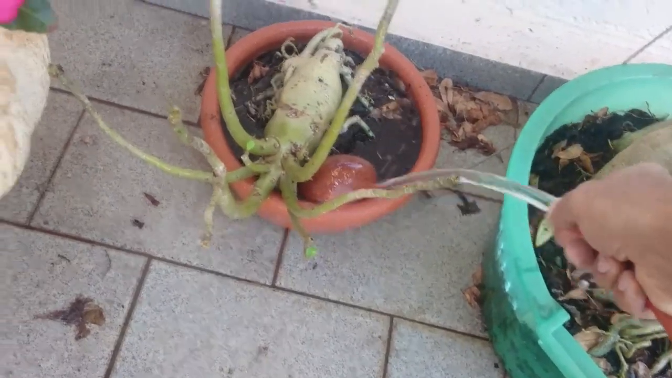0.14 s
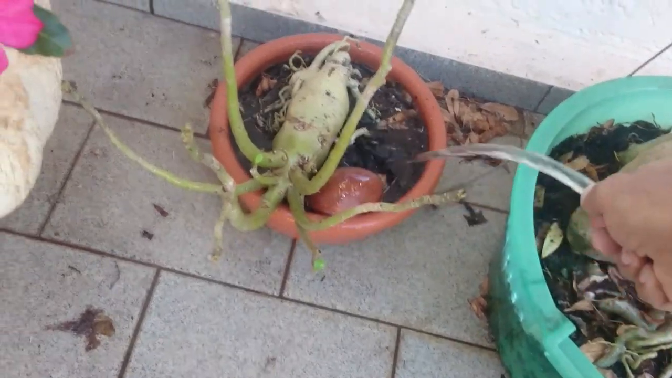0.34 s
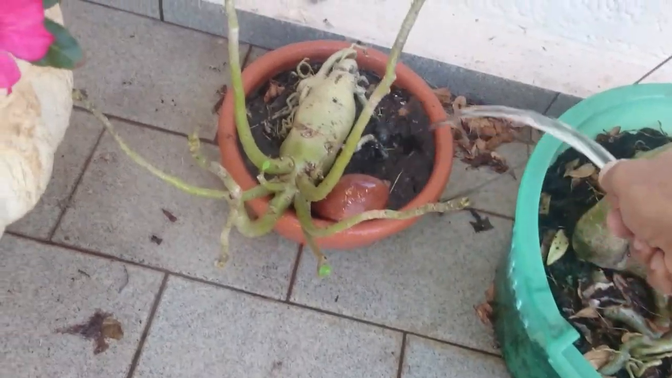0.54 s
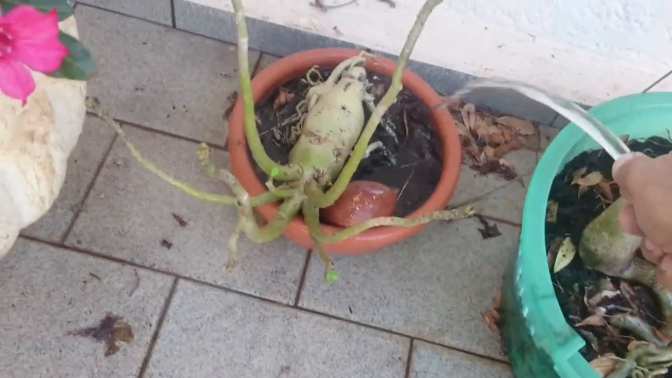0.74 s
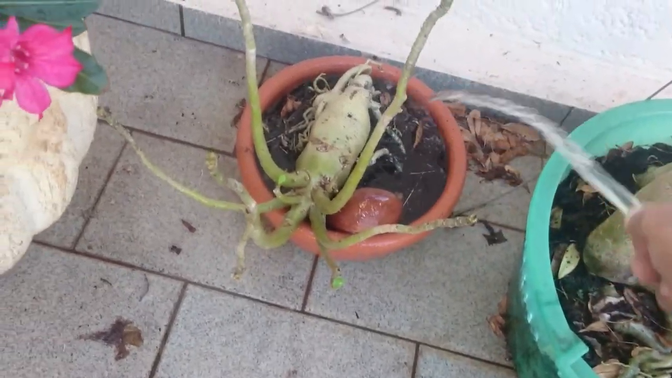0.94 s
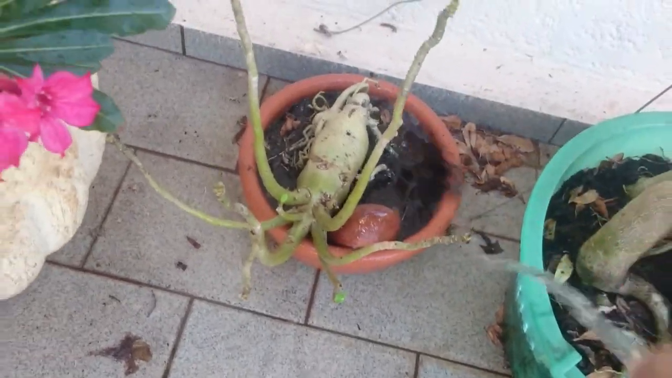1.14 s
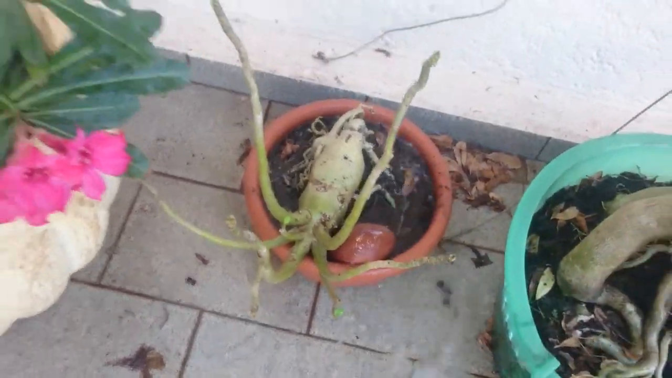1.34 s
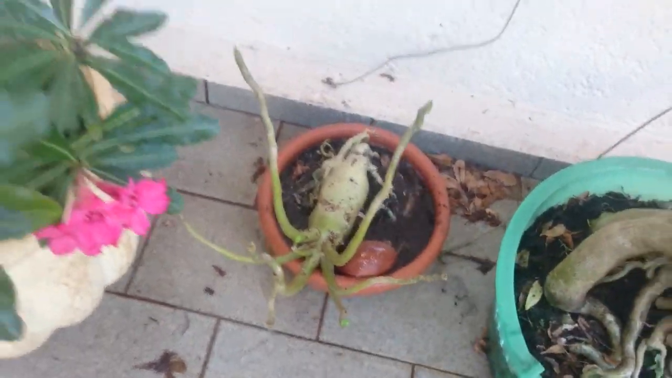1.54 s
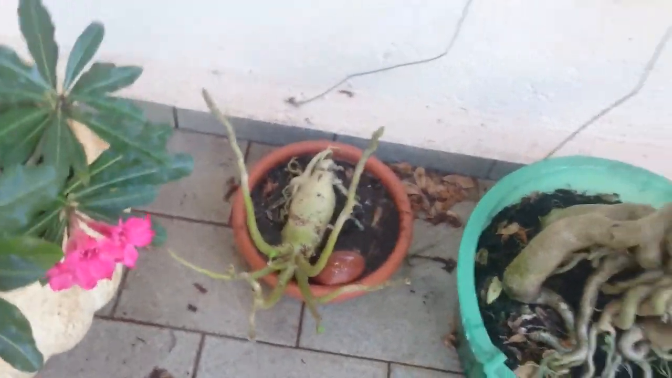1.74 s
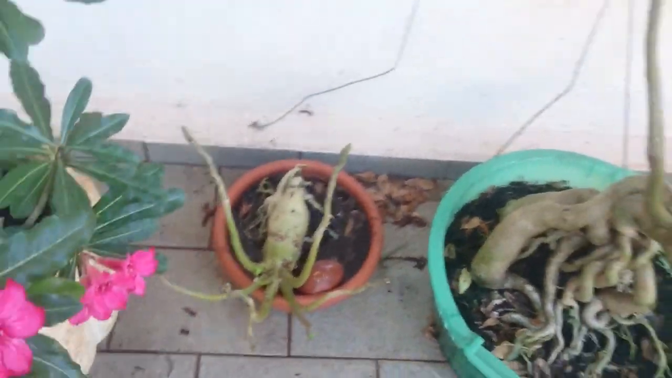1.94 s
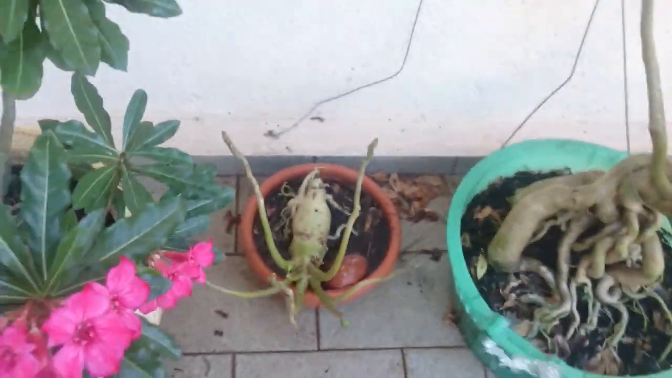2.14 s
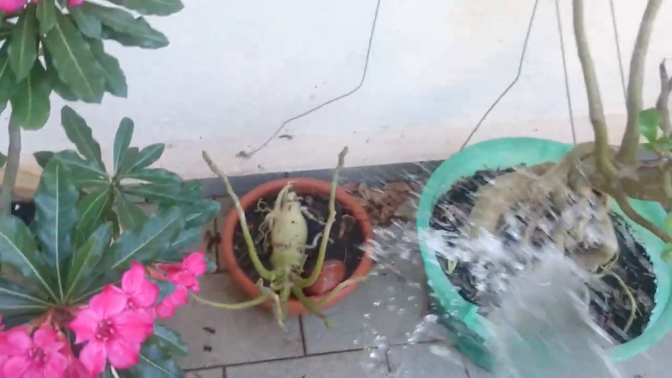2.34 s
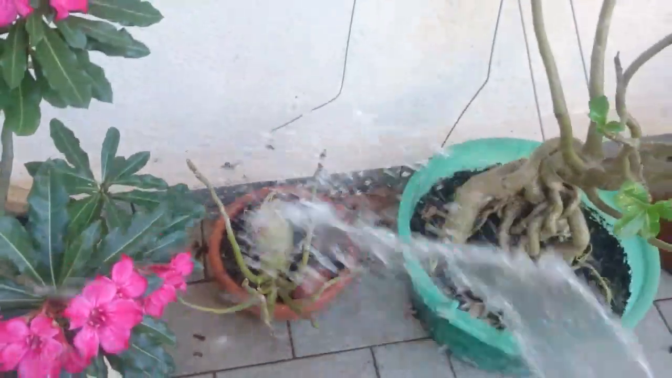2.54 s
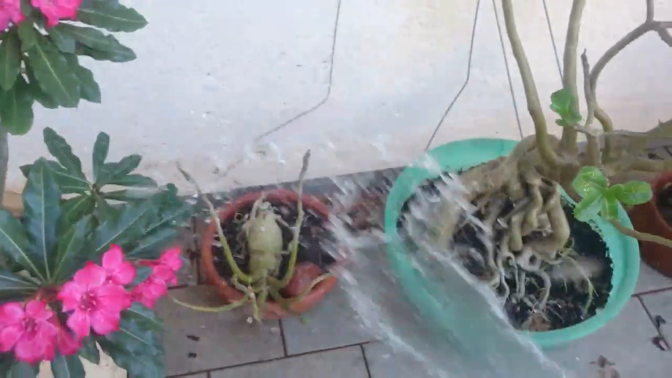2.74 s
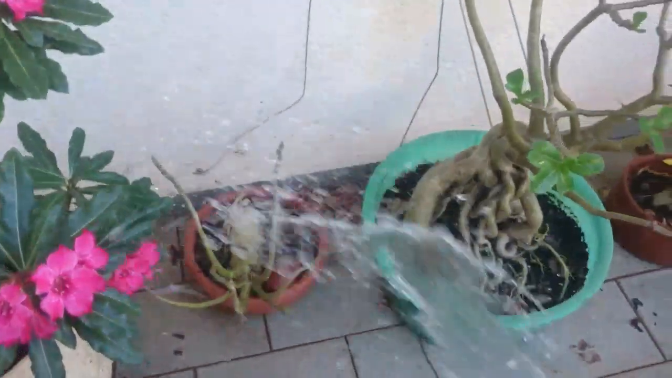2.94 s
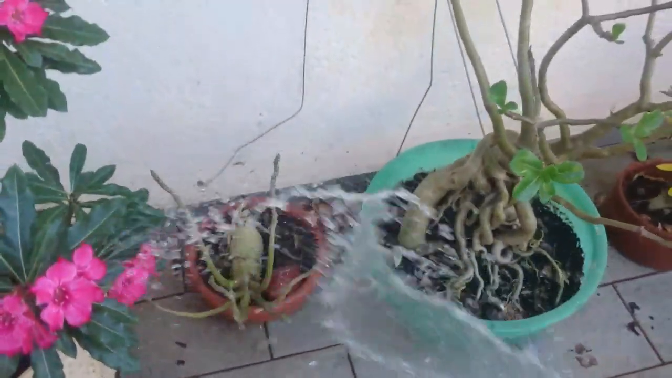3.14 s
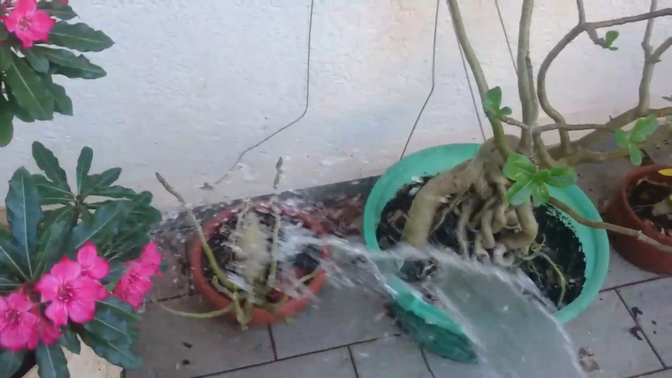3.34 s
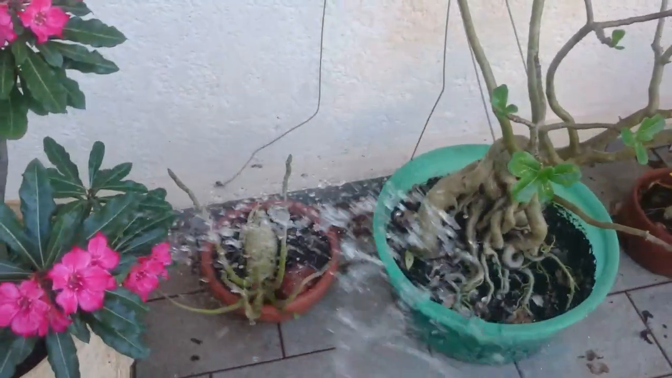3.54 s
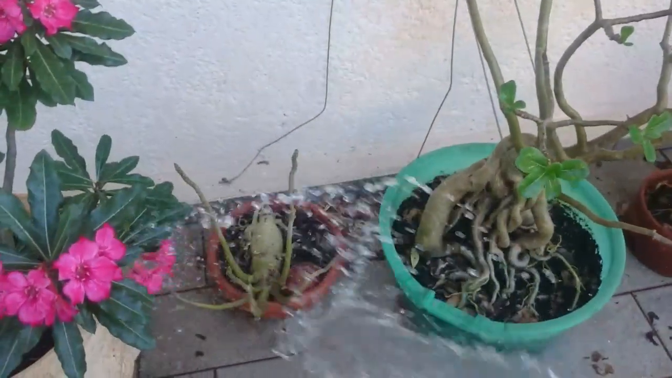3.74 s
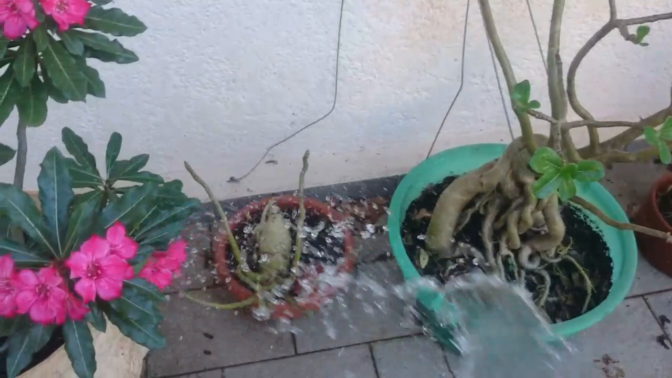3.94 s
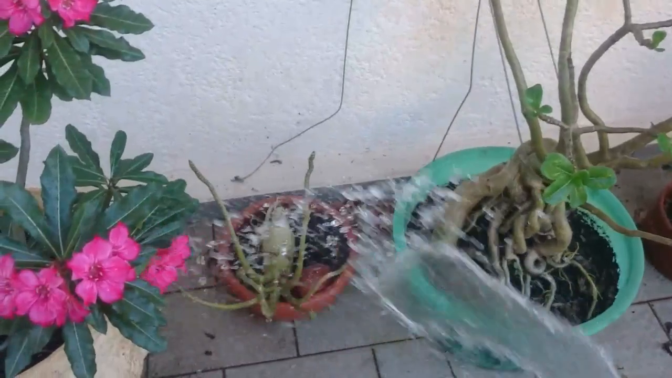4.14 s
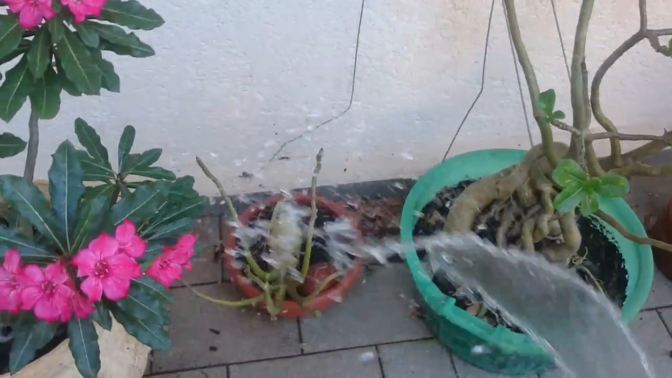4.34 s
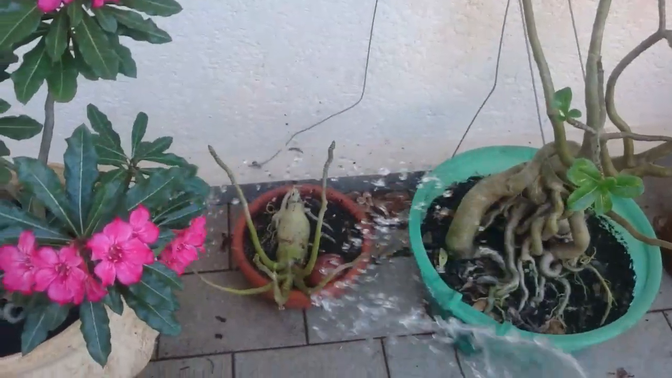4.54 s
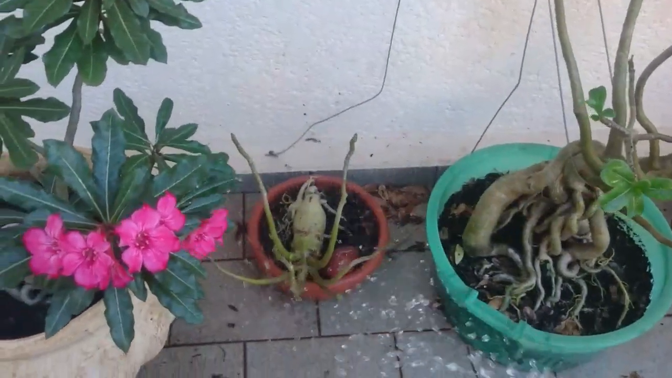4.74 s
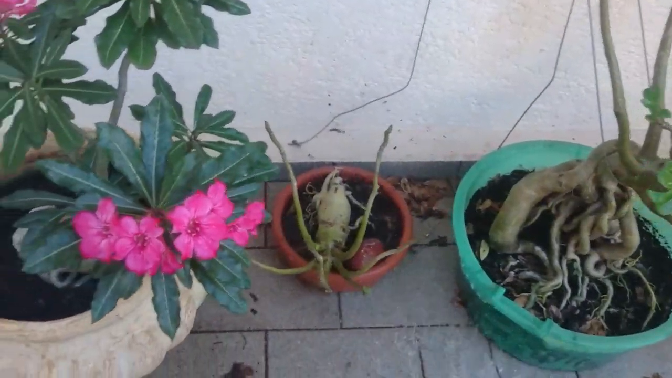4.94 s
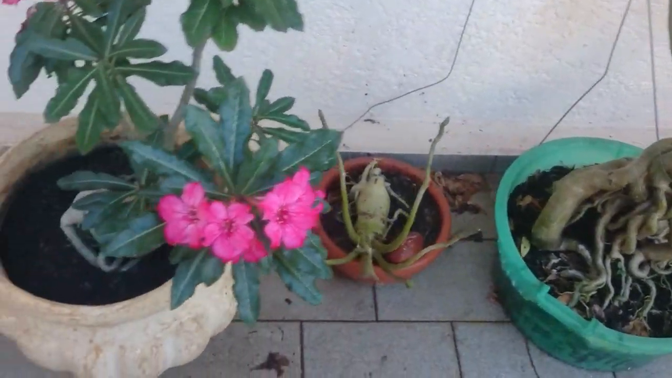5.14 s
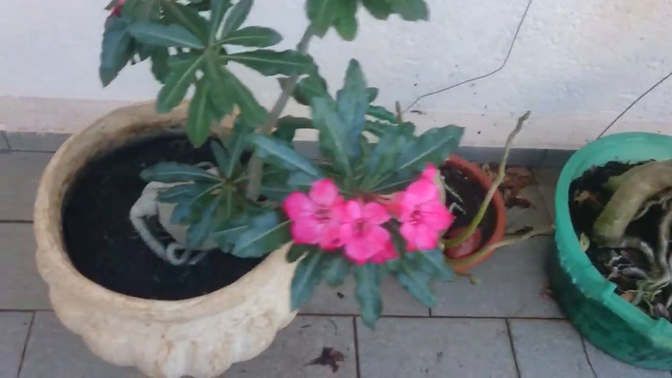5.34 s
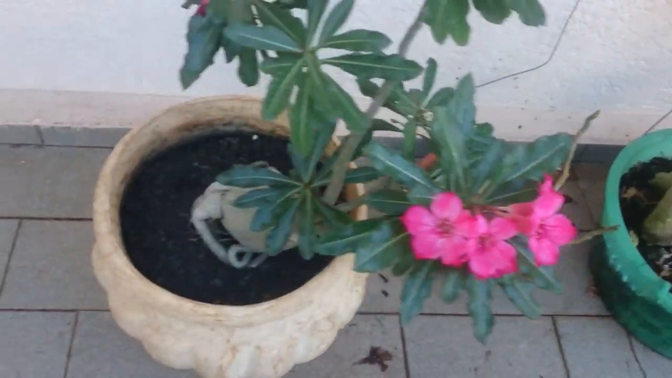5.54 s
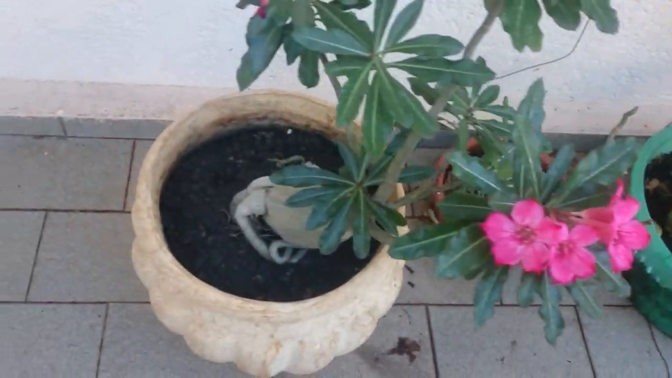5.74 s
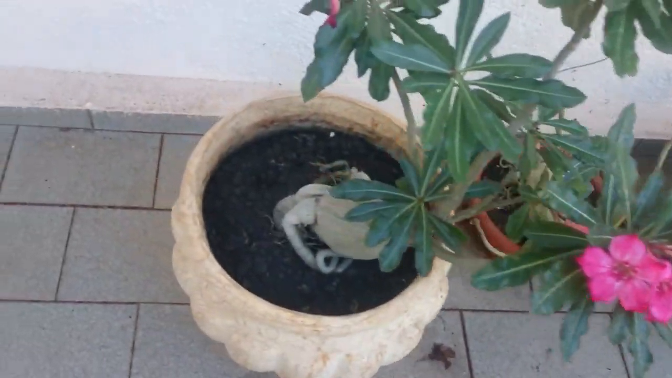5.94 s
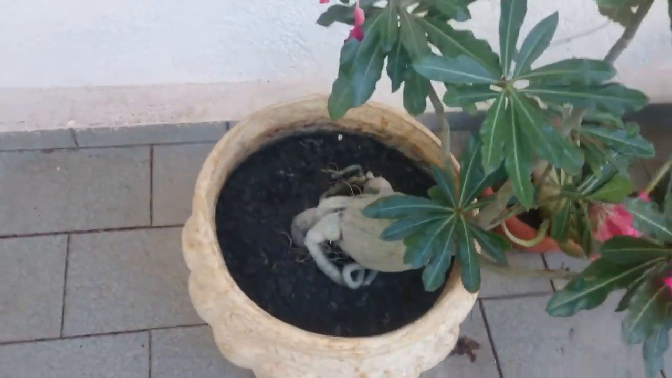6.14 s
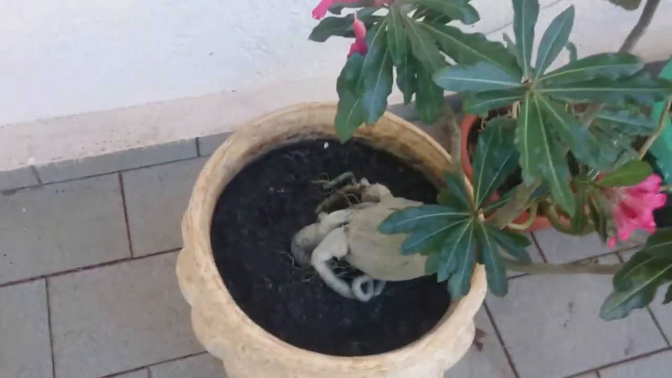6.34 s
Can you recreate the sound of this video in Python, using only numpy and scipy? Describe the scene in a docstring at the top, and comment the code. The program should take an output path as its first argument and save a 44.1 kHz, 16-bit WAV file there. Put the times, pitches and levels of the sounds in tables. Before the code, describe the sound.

A thin jet from a garden hose gurgles into the wet soil of a small flowerpot. It then fans out, and lumps of water slap unevenly on a big tub, leaves and tiles over a bright patter of drops. Near the end the spray moves off and patters more softly. The hand-held microphone is close, on a tiled patio with a short echo and a faint outdoor rumble.

```python
"""Garden hose on a tiled patio.

A thin jet gurgles into the soil of a small pot, trapping bubbles that ring. It fans out:
lumps of water slap on a big tub, leaves and tiles, over a patter of drops and mist.
The spray moves off and patters on. Tiles and house wall echo the water over a faint
outdoor rumble; air and handling bump the hand-held microphone."""
import sys
import numpy as np
from scipy import signal
from scipy.fft import rfft, irfft, next_fast_len
from scipy.io import wavfile

SR = 44100
rng = np.random.default_rng(int(sys.argv[2]) if len(sys.argv) > 2 else 0)


def to_wav(s):
    """Save 16-bit WAV."""
    ch = np.atleast_2d(s).T  # columns
    pcm = np.round(np.clip(ch, -1, 1) * 32767)  # PCM
    wavfile.write(sys.argv[1], SR, pcm.astype(np.int16))


N = 286650
TIME = np.arange(N) / SR


def amp(db):
    """Decibels to gain."""
    return 10 ** (np.asarray(db) / 20)


def unit(x):
    """Scale to rms 1."""
    return x / np.sqrt(np.mean(x ** 2) + 1e-20)


def panned(db):
    """Stereo gains for a left-minus-right level."""
    return amp(np.array([[.5], [-.5]]) * db)


def curve(rows, column=1):
    """Time table column at every sample."""
    columns = np.transpose(rows)
    return np.interp(TIME, columns[0], columns[column])


def at_hz(rows, hz, column=1):
    """Frequency table column, interpolated on a log axis."""
    columns = np.transpose(rows)
    return np.interp(np.log(hz + 1), np.log(columns[0]), columns[column])


def colour(x, rows, column=1):
    """Filter by a table of freq_hz, gain_db."""
    size = next_fast_len(N + 4096)
    gain = amp(at_hz(rows, np.fft.rfftfreq(size, 1 / SR), column))
    return irfft(rfft(x, size) * gain, size)[..., :N]


def add(mix, start_s, sound):
    """Mix in a stereo sound."""
    part = mix[:, max(round(start_s * SR), 0):][:, :sound.shape[1]]
    part += sound[:, :part.shape[1]]


def wander(step_s, t):
    """Random drift, rms about 1."""
    knots = rng.standard_normal(1024)
    return 1.2 * np.interp(t / step_s, np.arange(len(knots)), knots)


def swell(t, rise_s, fall_s):
    """Exponential rise and fall, peak 1 at t = 0."""
    return np.exp(np.minimum(t / rise_s, -t / fall_s))


def ping(hz, cycles, rise=0., size=1024):
    """Air pocket ring: soft onset, decay over a few cycles, optional pitch rise."""
    age = np.arange(size) / SR * hz / cycles
    return unit(age * np.exp(-2 * age) * np.sin(2 * np.pi * cycles * (age + rise * age ** 2 / 2)))


def bubble(centre_hz, scatter, cycles, spread_db, draws):
    """One rising stereo bubble; four draws in 0-1 set strength, pitch, pan and lag."""
    strength, tune, side, lag = draws
    hz = centre_hz * ((tune + .03) / (1.03 - tune)) ** (scatter / 2)
    ring = ping(hz, cycles, rise=0.063) * amp(spread_db * min(-np.log(1 - strength), 3))
    return np.array([ring, np.roll(ring, int(10 * lag))]) * panned(8 * (side - .5))


def splash(envelope, hz, lowest_hz, width_octaves, skirt_db):
    """Noise burst: one resonance in a skirt of hiss, cut below lowest_hz."""
    freq_hz = np.fft.rfftfreq(len(envelope), 1 / SR) + 1
    resonance = np.exp(-.5 * (np.log2(freq_hz / hz) / width_octaves) ** 2)
    skirt = amp(skirt_db) / np.sqrt(1 + (freq_hz / (2 * hz)) ** 2)
    gain = (resonance + skirt) / (1 + (lowest_hz / freq_hz) ** 10)
    hiss = irfft(rfft(rng.standard_normal((2, len(envelope)))) * gain) * envelope
    return hiss / np.sqrt((hiss ** 2).sum(1, keepdims=True) / (envelope ** 2).sum())


# Lowest ring of the wet surface, deep in soil, thin on leaves: time_s, pitch_hz
SURFACE_RING = [(.2, 1300), (1.2, 2980), (2.1, 2980), (2.3, 2100), (2.45, 2880), (2.8, 2180), (3.4, 1720),
                (3.83, 1600), (3.95, 3100), (4.2, 2400), (4.5, 2960)]
# Water lumps on pots, leaves and tiles: start_s, crack_db, pitch_hz, pan_db, droplets_db
LUMPS = [(.059, -31.5, 4850, -11, -46.5), (0.176, -32.5, 2440, 9, -36.5), (0.2081, -19.5, 2580, -2, -31.5),
         (.5823, -28, 4530, 8, -48), (1.227, -18.5, 4600, 5.5, -29), (1.2615, -29, 3990, -3, -31.5),
         (1.3342, -15, 4700, -0.5, -34), (1.538, -26, 4220, 1, -51), (1.65, -38, 4720, 2, -55),
         (1.795, -30, 8000, -6, -34), (1.9356, -21, 8450, 1, -31.5), (2.026, -24.5, 6130, 9, -39),
         (2.061, -23.5, 5100, 8, -45), (2.2543, -21, 4970, 5, -34), (2.2778, -11, 6300, -1.5, -34),
         (2.2894, -16.5, 5230, 4, -25.5), (2.3402, -16, 5560, 0.5, -34), (2.3997, -14.5, 4900, 2, -41),
         (2.4145, -21.5, 8800, 4, -34), (2.4572, -21, 4800, 1, -46), (2.4713, -13, 4600, 3.5, -41),
         (2.595, -16, 5000, 0, -28.5), (2.675, -28, 5000, -2, -31.5), (2.755, -19, 4700, 2, -36),
         (2.78, -30, 4400, -1, -31.5), (2.806, -12, 4260, -4.5, -25.5), (2.892, -24.5, 6840, 5, -41),
         (2.943, -28, 5500, 2, -33.5), (3.063, -18, 3900, -3, -32.5), (3.1253, -21.5, 4980, -6, -42),
         (3.1716, -14, 4240, -3, -26.5), (3.3463, -22.5, 9000, 0, -40), (3.365, -20, 6200, 0, -40),
         (3.4189, -12.5, 3700, 0, -32), (3.4308, -11.5, 4250, -3, -29), (3.452, -14.5, 4670, 3, -26),
         (3.482, -15, 3880, -5, -31), (3.5836, -17.5, 5140, -3, -25.5), (3.6898, -20, 4200, -3, -29),
         (3.8263, -17, 2270, -4, -36), (3.845, -24, 5800, 2.5, -31), (3.929, -16.5, 4900, 0, -41),
         (3.997, -24, 5000, 1, -29.5), (4.088, -39, 5100, -3, -30.5), (4.2074, -22, 3120, 1, -29),
         (4.239, -19, 5540, 1, -30), (4.272, -26, 7000, -4, -32), (4.36, -34, 5500, 9, -37),
         (4.431, -27, 8360, 3, -36), (4.521, -15, 4600, 1, -31), (4.6875, -18.5, 3670, 3.5, -28),
         (4.7687, -20, 9300, 4, -35), (4.8049, -14.5, 3600, 1, -36), (4.846, -19.5, 4860, 6, -42),
         (4.883, -16, 5560, 0, -29.5), (4.9057, -12.5, 4860, 4, -45), (4.9322, -17, 5330, 2, -26),
         (4.9842, -20, 5100, 10, -31.5), (5.008, -14.5, 4640, 1, -28.5), (5.184, -28.5, 4000, 0, -42),
         (5.2663, -30, 4230, 2, -39), (5.437, -27.5, 4940, -7, -45), (5.53, -31, 9000, 5, -43),
         (5.7336, -28, 6440, 1, -45), (6.0314, -36, 4260, 0, -42), (6.25, -45, 6000, -4, -37.5),
         (6.3185, -32, 5070, -3, -44)]


def slaps(crack_gain_db=-5.5, droplets_gain_db=-7, droplet_hz=4500, crack_s=0.00077,
          throw_s=0.014, fall_s=0.013, lead_db=-7, lead_s=0.0038, clump_db=-0.5, clump_s=.0013):
    """A few drops lead each lump; it bursts, then rains down in clumps of droplets."""
    out, ahead_s = np.zeros((2, N)), .02
    t = np.arange(6144) / SR - ahead_s
    age_s = np.maximum(t, 0)
    crack = (age_s / (2 * crack_s)) ** 2 * np.exp(2 - age_s / crack_s)
    shower = (1 - np.exp(-age_s / throw_s)) * np.exp(-age_s / fall_s)
    shower = shower / shower.max() + amp(lead_db) * np.exp(-abs(t) / lead_s)
    for start_s, crack_db, hz, pan_db, droplets_db in LUMPS:
        lowest_hz = np.interp(start_s, *np.transpose(SURFACE_RING))
        shower_hz = np.sqrt(hz * droplet_hz)
        clumps = unit(amp(clump_db * wander(clump_s, t + ahead_s)))
        hit = splash(crack, hz, lowest_hz, width_octaves=0.18, skirt_db=-15.5)
        droplets = splash(shower * clumps, shower_hz, lowest_hz, width_octaves=0.46, skirt_db=-5.5)
        slap = amp(crack_db + crack_gain_db) * hit + amp(droplets_db + droplets_gain_db) * droplets
        add(out, start_s - ahead_s, panned(pan_db) * slap)
    return out


# Steady flow (thin jet, open fan, far off): time_s, level_db
STEADY_FLOW = [(0, -43.5), (.5, -47), (1.08, -40.5), (1.19, -44), (1.48, -43), (1.69, -46), (2.01, -42.5),
               (2.06, -33.5), (2.22, -40), (2.48, -36.5), (2.73, -44.5), (3.03, -38), (3.3, -40.5),
               (3.85, -44), (4.63, -40), (4.93, -35.5), (5.1, -43), (5.4, -47.5), (5.95, -50), (6.5, -47.5)]


def landing_gain(wake_db=-7, lag_s=.008, rise_s=0.019, fall_s=0.018, uneven_db=0.82, uneven_s=.03):
    """Amount of water landing: uneven flow plus a wake of spray with each lump."""
    t = np.arange(0, N / SR, .001)
    flow = amp(curve(STEADY_FLOW) + uneven_db * wander(uneven_s, TIME))
    wake_power = sum((amp(droplets_db + wake_db) * swell(t - start_s - lag_s, rise_s, fall_s)) ** 2
                     for start_s, *_, droplets_db in LUMPS)
    return np.sqrt(flow ** 2 + np.interp(TIME, t, wake_power))


def drops(hz, per_s, spread_db=1.0, flurry_db=2.5, flurry_s=.025):
    """Drop ticks of one pitch, in flurries; each has its own pan and stereo lag."""
    when, weakness, side, lag = rng.random((int(per_s * N / SR), 4)).T
    at = (when * N).astype(int)
    lag_samples = np.round(36 * (lag - .5)).astype(int)
    level_db = flurry_db * wander(flurry_s, at / SR) - spread_db * np.minimum(-np.log(1 - weakness), 4)
    left, right = amp(level_db) * panned(8 * (side - .5))
    impacts = np.zeros((2, N))
    impacts[0, at] = left
    impacts[1, (at + lag_samples) % N] = right
    return unit(signal.oaconvolve(impacts, ping(hz, cycles=1.46, size=512)[None], axes=1)[:, :N])


# Spray spectrum: freq_hz, gain_db
SPRAY_SPECTRUM = [(300, -18), (700, -31), (1500, -13), (2400, -12), (3100, -6), (4000, 1), (5200, 2.5),
                  (7000, -1.5), (10000, -8), (16000, -10.5)]
# Landing spot, soil to hard tile: time_s, mist_db, pan_db
SPRAY_AIM = [(0, -1.5, -3.5), (.7, 1, -2), (1.6, -1, -4.5), (2.1, -1, -1.5), (2.45, 4.5, -1),
             (2.75, 3, -2.5), (3.9, 3, -2.5), (4.9, 3, -1.5), (5.9, 4, -3), (6.5, 3, -4)]


def spray(mist_gain_db=1, mist_above_hz=7200, per_s_at_4khz=400):
    """Thousands of drops a second, the smallest most numerous; on tile they burst into mist."""
    patter, mist = np.zeros((2, 2, N))
    for hz in np.geomspace(700, 15000, 16):
        layer = mist if hz > mist_above_hz else patter
        layer += np.sqrt(hz) * drops(hz, per_s_at_4khz * hz / 4000)
    patter = colour(patter, SPRAY_SPECTRUM)
    mist = colour(mist, SPRAY_SPECTRUM) * amp(curve(SPRAY_AIM) + mist_gain_db)
    return (patter + mist) / np.std(patter) * panned(curve(SPRAY_AIM, column=2))


def plinks(gain_db=-12, per_s=70):
    """Drops in standing water trap bubbles that ring for a few milliseconds."""
    out = np.zeros((2, N))
    for when, *draws in rng.random((int(per_s * N / SR), 5)):
        ring = bubble(centre_hz=4600, scatter=0.288, cycles=12, spread_db=5.0, draws=draws)
        add(out, when * N / SR, ring)
    return unit(out) * amp(gain_db)


# Jet on the wet soil of the small pot: time_s, level_db
SOIL_TRICKLE = [(0, -50), (.12, -49), (.19, -42.5), (.32, -36), (.42, -47), (.58, -36), (.7, -44),
                (.77, -45), (.92, -37), (.98, -48), (1.11, -36), (1.19, -59)]


def bubbling(gain_db, centre_hz, per_s, scatter, cycles, spurt_db, spurt_s=.03, drift_octaves=0.069):
    """The jet traps bubbles in spurts; their common pitch drifts as it moves over the soil."""
    out = np.zeros((2, N))
    start_s, end_s = SOIL_TRICKLE[0][0], SOIL_TRICKLE[-1][0]
    pitch_hz = centre_hz * 2 ** (drift_octaves * wander(spurt_s, TIME))
    for when, *draws in rng.random((int(per_s * (end_s - start_s)), 5)):
        at_s = start_s + when * (end_s - start_s)
        add(out, at_s, bubble(pitch_hz[int(at_s * SR)], scatter, cycles, spread_db=3.5, draws=draws))
    out /= np.std(out[:, (TIME > start_s) & (TIME < end_s)])
    return out * amp(curve(SOIL_TRICKLE) + gain_db + spurt_db * wander(spurt_s, TIME))


# Jet digging into wet soil: peak_s, level_db, pitch_hz
SOIL_GLUGS = [(.172, -44.5, 1365), (.225, -45, 2530), (.29, -51, 2710), (.665, -47, 2100), (.79, -41, 2440),
              (0.846, -43, 2370), (1.045, -43.5, 2580), (1.105, -47, 1605), (1.142, -40.5, 2310)]


def glugs(rise_s=0.027, fall_s=0.018, octaves_per_s=3.8, bubbles=80, size=8192):
    """The jet drags a bubble cloud into the puddle; pitch climbs as the hollow closes."""
    out, length_s = np.zeros((2, N)), size / SR
    envelope = swell(np.arange(size) / SR - length_s / 2, rise_s, fall_s)
    for peak_s, level_db, pitch_hz in SOIL_GLUGS:
        cloud = np.zeros((2, size))
        for k, (when, *draws) in enumerate(rng.random((bubbles, 5))):
            at_s = length_s * (k + when) / bubbles
            hz = pitch_hz * 2 ** (octaves_per_s * (at_s - length_s / 2))
            add(cloud, at_s, bubble(hz, scatter=0.296, cycles=9.2, spread_db=1.5, draws=draws))
        add(out, peak_s - length_s / 2, amp(level_db) * unit(cloud) * envelope)
    return out


# Patio reverberation: freq_hz, t60_s
PATIO_DECAY = [(300, 0.23), (2000, 0.24), (5000, 0.21), (10000, 0.056), (16000, 0.14)]


def echoes(wall_db=-12, wall_s=0.0086, tail_db=-8, build_s=0.00051, reflections=6):
    """Response at one spot: quick echoes off tiles and wall, a short diffuse tail."""
    hz, t, noise = signal.stft(rng.standard_normal((2, 11264)), SR, nperseg=256)
    decay = amp(-60 * t / at_hz(PATIO_DECAY, hz)[:, None])
    onset = 1 - np.exp(-t / build_s)
    _, tail = signal.istft(noise * decay * onset, SR, nperseg=256)
    response = amp(tail_db) * tail / np.linalg.norm(tail[0])
    for side in response:
        at = (wall_s * SR * rng.uniform(.4, 1.8, reflections)).astype(int)
        side[at] += amp(wall_db) * rng.choice([-1, 1], reflections) / np.sqrt(reflections)
    return response


def patio(water, size=16384):
    """Direct sound plus echoes that change as water and microphone move."""
    out, fade = water.copy(), signal.windows.cosine(size)
    for start in range(0, N, size // 2):
        part = water[:, start:start + size]
        add(out, start / SR, signal.fftconvolve(part * fade[:part.shape[1]], echoes(), axes=1))
    return out


# Outdoor background: freq_hz, density_db, stereo_correlation
RUMBLE_SPECTRUM = [(20, -24, -.8), (40, -19, -0.73), (64.6, 1.5, -1.03), (91, -5.5, -0.89),
                   (125, -8, -0.99), (248, -12, -0.84), (410, -14.5, -0.72), (650, -11.5, -0.38),
                   (1230, -11, 0.16), (1780, -13, 0.29), (2360, -18, -0.25), (8000, -21.5, 1)]
# Its slow swell: time_s, gain_db
RUMBLE_SWELL = [(0, 2), (1.4, -1), (2.2, 1.5), (3.3, 3), (4, 3.5), (4.4, 6.5), (5, 2.5), (5.7, 5),
                (6.5, 0.5)]


def rumble(level_db=-53, pan_db=-2.0, split_hz=140, bass_swell_share=0.72):
    """Distant rumble; the bass swells less and is in opposite phase left and right."""
    hz = np.fft.rfftfreq(N, 1 / SR)
    left, independent = rfft(rng.standard_normal((2, N)))
    correlation = np.clip(at_hz(RUMBLE_SPECTRUM, hz, column=2), -1, 1)
    right = correlation * left + np.sqrt(1 - correlation ** 2) * independent
    air = unit(irfft(np.array([left, right]) * amp(at_hz(RUMBLE_SPECTRUM, hz)), N))
    bass = irfft(rfft(air) / (1 + (hz / split_hz) ** 4), N)
    swell_db = curve(RUMBLE_SWELL)
    swelling = bass * amp(bass_swell_share * swell_db) + (air - bass) * amp(swell_db)
    return swelling * amp(level_db) * panned(pan_db)


# Air and handling bumps: start_s, level_db
MIC_BUMPS = [(2.185, -54.5), (2.28, -64.5), (3.8, -62)]


def buffet(band_hz=(34, 100), stereo_width=0.95, peak_s=0.034):
    """Soft low bumps as the microphone swings."""
    noise = rng.standard_normal(N) + stereo_width * rng.standard_normal((2, N))
    low = signal.sosfilt(signal.butter(2, band_hz, "band", fs=SR, output="sos"), noise)
    ages = [(np.maximum(TIME - start_s, 0) / peak_s, db) for start_s, db in MIC_BUMPS]
    return unit(low) * sum(amp(db) * age * np.exp(1 - age) for age, db in ages)


def scene():
    """Water on the patio, over the background."""
    trickle = bubbling(gain_db=-4.0, centre_hz=4180, per_s=810, scatter=0.14, cycles=11, spurt_db=4.0)
    burble = bubbling(gain_db=-15.0, centre_hz=2455, per_s=320, scatter=0.287, cycles=9, spurt_db=2.0)
    water = slaps() + landing_gain() * (spray() + plinks()) + trickle + burble + glugs()
    return patio(water) + rumble() + buffet()


# Microphone port response: freq_hz, left_db, right_db
MIC_PORTS = [(1100, 2, 3), (1710, 0, -1.5), (1910, 5.5, 1), (2370, 5, 1.5), (3930, -0.5, 0.5),
             (5830, 2, -4), (6420, 0.5, -9), (7930, -3.5, -3.5), (9670, 11, -3), (9850, 5.5, 1.5),
             (12250, -8, 4), (13600, -11, -1.5), (15800, -21, -3)]


def record(dry, cutoff_hz=15900):
    """Each port colours its channel; a low-pass limits the band."""
    ports = np.array([colour(dry[0], MIC_PORTS, column=1), colour(dry[1], MIC_PORTS, column=2)])
    lowpass = signal.firwin(511, cutoff_hz, window=("kaiser", 9), fs=SR)
    return signal.oaconvolve(ports, lowpass[None], "same")


dry = scene()
out = record(dry)
to_wav(out)
```